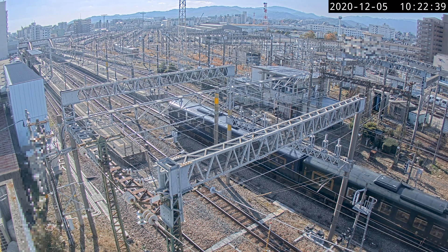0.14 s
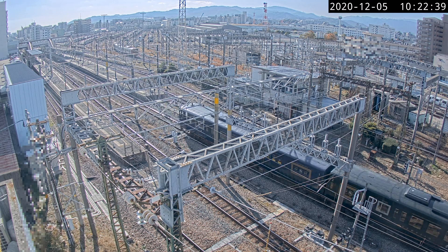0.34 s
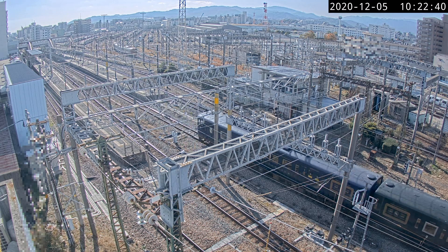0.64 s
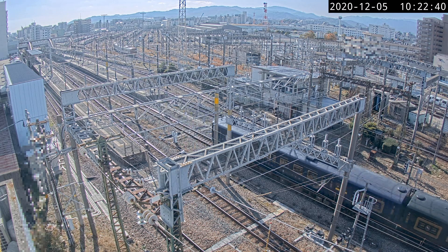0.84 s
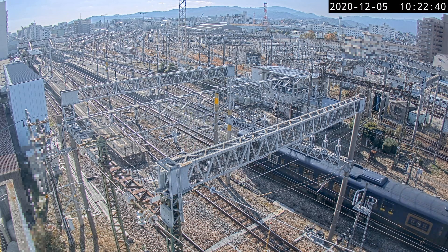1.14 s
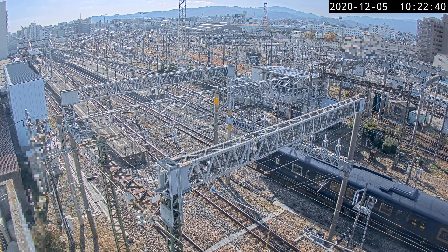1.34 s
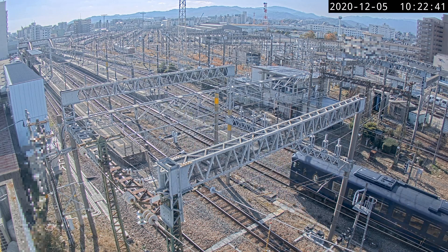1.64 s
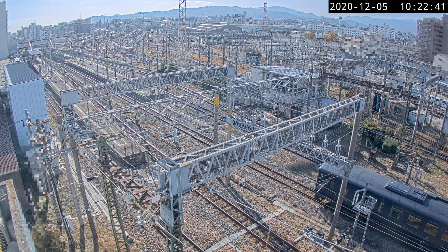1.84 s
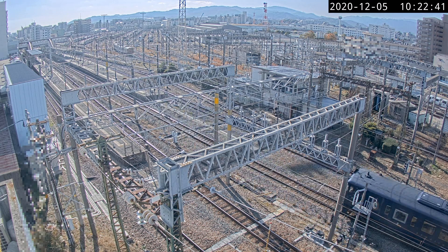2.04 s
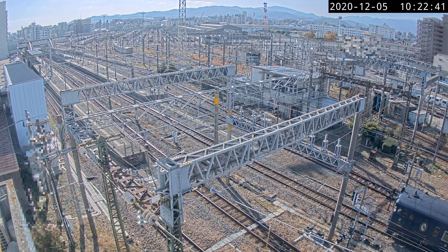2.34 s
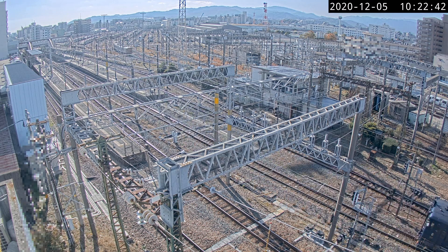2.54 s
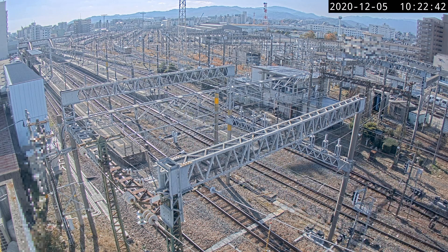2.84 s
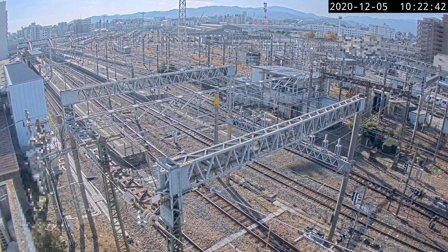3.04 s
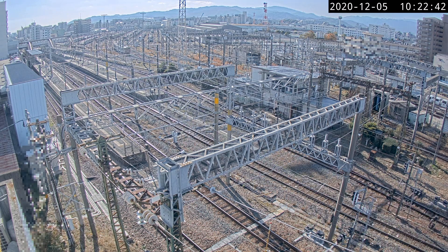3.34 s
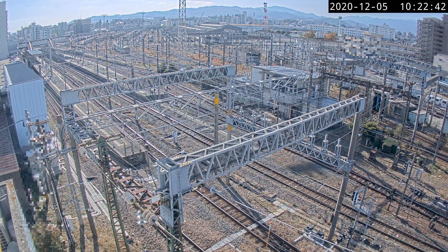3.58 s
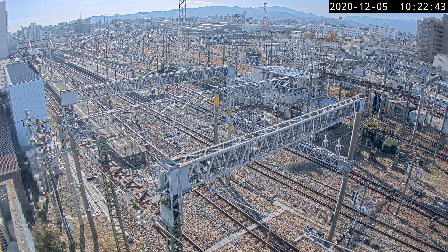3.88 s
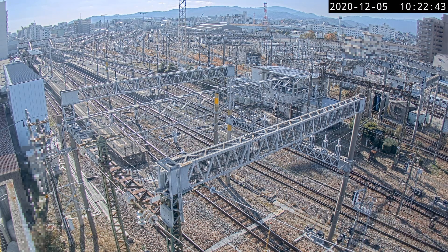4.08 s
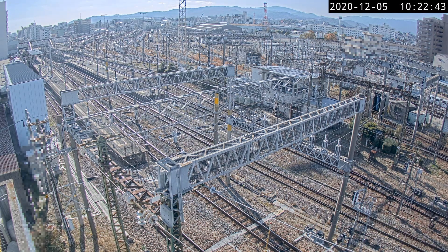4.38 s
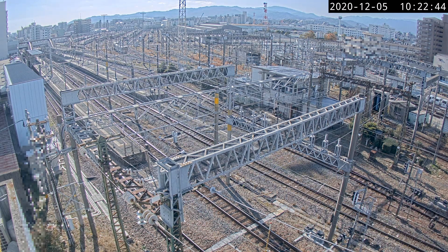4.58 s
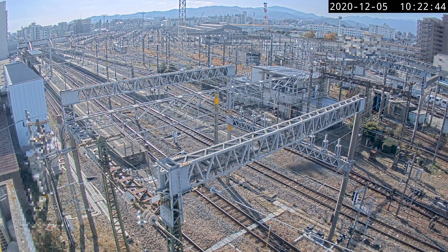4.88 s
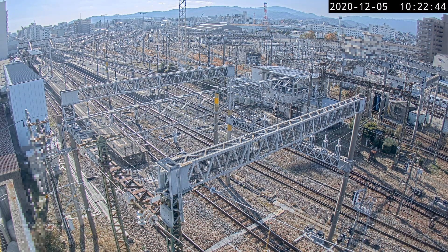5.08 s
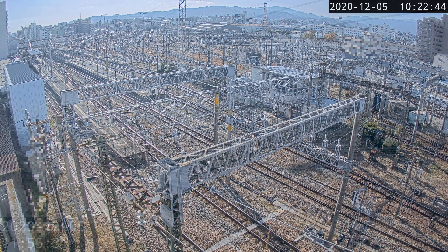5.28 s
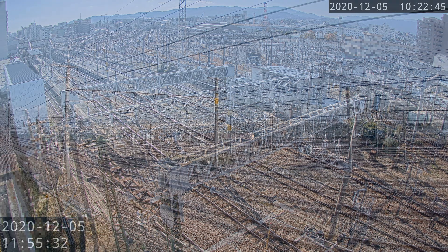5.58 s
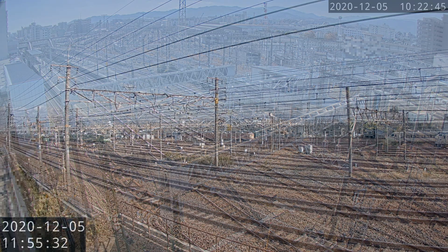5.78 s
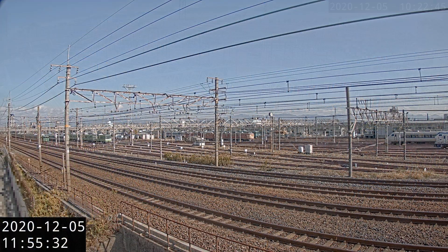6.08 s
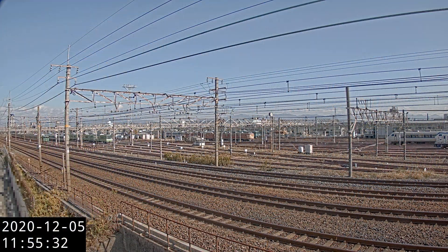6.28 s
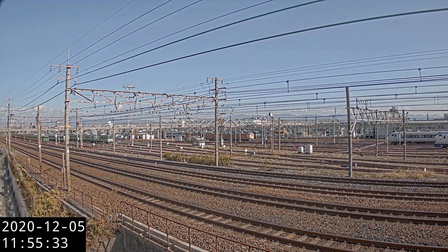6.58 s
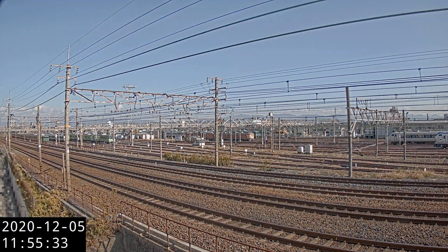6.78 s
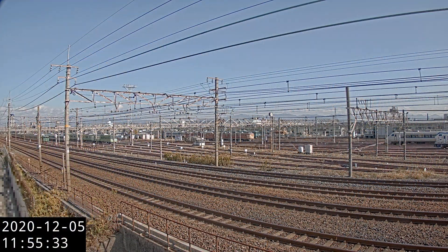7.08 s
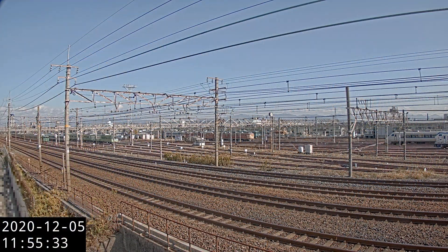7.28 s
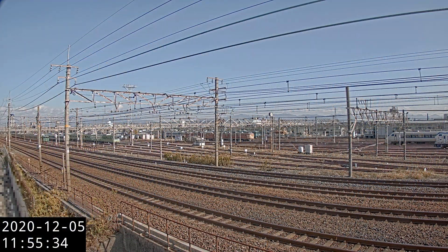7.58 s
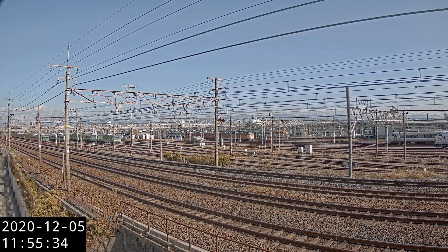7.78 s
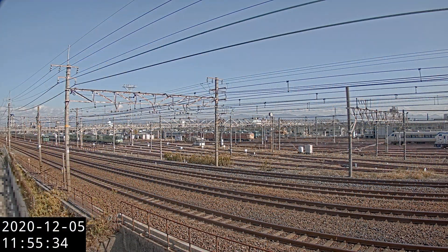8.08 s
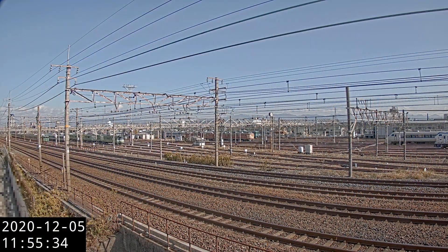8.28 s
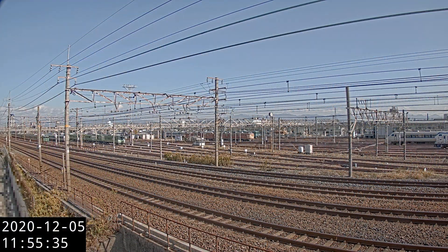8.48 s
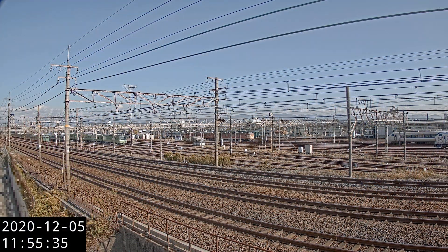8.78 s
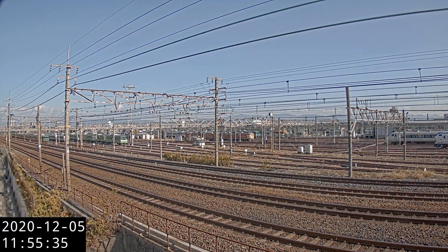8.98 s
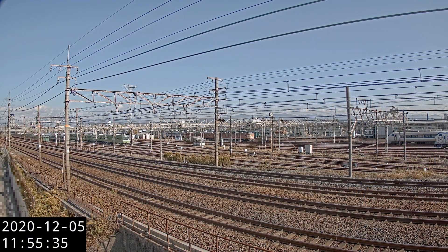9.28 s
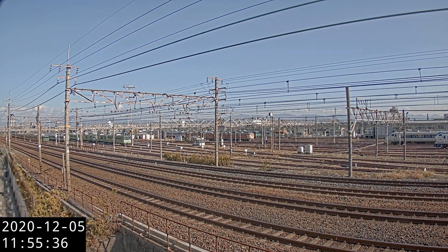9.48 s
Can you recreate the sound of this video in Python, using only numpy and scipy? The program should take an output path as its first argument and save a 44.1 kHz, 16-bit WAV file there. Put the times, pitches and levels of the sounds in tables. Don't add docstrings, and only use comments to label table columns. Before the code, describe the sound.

The last cars of a train pass an elevated microphone in a rail yard: broad, boxy wheel roar, bass thumps and very high, scraping flange whine. Two dull joint knocks land as the tail leaves, the whine slides down and the roar loses treble. A crossfade brings much quieter empty tracks with distant hum, small dry ticks and faint rustles.

```python
import sys
import numpy as np
from scipy import signal
from scipy.io import wavfile
from scipy.ndimage import uniform_filter1d

SR = 44100
rng = np.random.default_rng(int(sys.argv[2]) if len(sys.argv) > 2 else 0)


def makeup_ratio(level_db):
    decades = np.asarray(level_db, float) / 20
    return 10 ** decades


def to_wav(sig):
    pcm = np.clip(np.atleast_2d(sig), -1, 1) * 32767
    pcm = np.round(pcm).astype(np.int16)
    wavfile.write(sys.argv[1], SR, pcm.T)


N = 424669
SIZE, HOP = 2048, 512


def spectrum(table, hz):
    f, db = np.transpose(table)
    return np.interp(np.log(np.maximum(hz, 1)), np.log(f), db)


def stft(x):
    return signal.stft(x, SR, nperseg=SIZE, noverlap=SIZE - HOP)


def istft(z):
    return signal.istft(z, SR, nperseg=SIZE, noverlap=SIZE - HOP)[1][:N]


def patches(shape, bins, rate):
    field = uniform_filter1d(rng.standard_normal(shape), max(int(bins), 1), axis=0)
    field = uniform_filter1d(field, max(int(SR / HOP / rate), 1), axis=1)
    return field / field.std()


def roar(colour, swell_db, flicker_db):
    hz, s, z = stft(rng.standard_normal(N))
    swell = swell_db * patches(z.shape, 87, 3)
    flicker = flicker_db * patches(z.shape, 24, 14)
    return istft(z * makeup_ratio(colour(hz, s) + swell + flicker)) * np.sqrt(SR / 2 / 350)


def waver(width_hz):
    low_pass = signal.butter(2, width_hz / 2, fs=SR, output="sos")
    w = signal.sosfilt(low_pass, rng.standard_normal((2, N)))
    return (w[0] + 1j * w[1]) / w.std() / np.sqrt(2)


def line(hz, level_db, parts):
    carrier = np.exp(2j * np.pi * np.cumsum(hz * np.ones(N)) / SR)
    modulation = sum(makeup_ratio(db) * waver(width) for width, db in parts)
    return np.sqrt(2) * makeup_ratio(level_db) * (carrier * modulation).real


def played(table):
    t, db = np.transpose(table)
    times = np.r_[t[0] - .15, t, t[-1] + .15]
    return np.interp(np.arange(N) / SR, times, np.r_[-200, db, -200])


def swells(table, rise, fall, s):
    t, db = np.array(table, float).T[:, :, None]
    return np.max(db - np.where(s < t, rise * (t - s), fall * (s - t)), axis=0)


def burst_shape(s, decay):
    return (1 - np.exp(-s / 0.0015)) * np.exp(-s / decay)


def fade_out(s):
    return np.interp(s, (5.406, 6.186), [1, 0]) ** 1.93


def hiss():
    return makeup_ratio(-85.5) * rng.standard_normal(N)


def flecks():
    rate, level_db, spread_db = 30, -84, 4
    strength = makeup_ratio(level_db + spread_db * np.minimum(rng.exponential(size=N), 3))
    start = (rng.random(N) < rate / SR) * strength
    decay = np.exp(-1 / (.004 * SR))
    burst = signal.lfilter([1], [1, -decay], start) * rng.standard_normal(N)
    return signal.sosfilt(signal.butter(2, [4800, 9000], "bandpass", fs=SR, output="sos"), burst)


def yard():
    # frequency in Hz, level in dB per Hz.
    hum_colour = [(20, 0), (60, 3), (120, -4.5), (250, -5.5), (500, -2.5), (740, -0.5), (845, 5.5),
                  (910, -7.5), (1020, -20.5), (1300, -14), (1500, -19), (2200, -5), (2500, -18), (2750, -37),
                  (3100, -21.5), (3600, -15), (4200, -22), (4700, -33), (4850, -32.5), (5350, -23.5),
                (6200, -35), (6700, -33.5), (7900, -36), (8600, -42), (10600, -38.5), (13000, -47),
                (15700, -58)]
    # frequency in Hz, line width in Hz, level in dB.
    machine_lines = [
        (63.4, 3, -64.5),
        (124, 10.5, -76),
        (2870, 8, -90.5),
    ]
    fade_in_s = (5.5, 6.07)

    def colour(hz, s):
        top = np.clip(np.log2(np.maximum(hz, 1) / 1200), 0, 1)
        since = s - fade_in_s[-1]
        level_db = -58 + 0.31 * since
        treble_db = -0.5 + 0.57 * since
        return spectrum(hum_colour, hz)[:, None] + level_db + np.outer(top, treble_db)
    machines = sum(line(hz, db, [(width, 0)]) for hz, width, db in machine_lines)
    hum = roar(colour, swell_db=.3, flicker_db=.8)
    return (hum + machines + flecks()) * np.interp(np.arange(N) / SR, fade_in_s, [0, 1])


def ticks():
    # start in seconds, peak in dB, ring in Hz, top in Hz, decay in seconds.
    crackles = [(5.322, -49, 5820, 9000, .013), (5.457, -47, 5540, 9500, 0.011),
                (5.489, -56, 8550, 11000, .02), (5.49, -73, 13800, 14500, .03),
                (5.35, -63, 8000, 11000, 0.025), (5.54, -56, 5800, 11000, .01),
                (5.74, -60, 7140, 8000, .0085), (6.474, -65, 5370, 5980, .0045),
                (6.637, -66, 5280, 8050, .005), (7.23, -66.5, 5500, 9050, .006),
                (7.6, -68, 5500, 8000, .006), (6.77, -79, 13900, 14000, .01), (7.77, -65, 5430, 7500, .006),
                (7.937, -65, 6650, 9000, .005), (8.228, -69, 6970, 8000, .006),
                (8.56, -60.5, 3550, 4200, .015), (8.505, -59, 3600, 4000, 0.05),
                (8.521, -57, 3100, 4000, 0.033), (8.611, -56, 5540, 12000, .0046),
                (8.653, -63, 7000, 12000, .006), (8.656, -47, 2300, 7000, 0.0044),
                (8.729, -71, 9750, 10500, .005), (9.479, -71, 6500, 8750, .005)]
    # start in seconds, peak in dB.
    stalks = [
        (5.6, -80),
        (6.7, -82),
        (7.15, -81),
        (7.66, -81.5),
        (8.35, -83),
        (8.39, -83),
        (9.13, -81),
    ]
    stalk_shape = (10500, 12000, .03)
    events = crackles + [stalk + stalk_shape for stalk in stalks]
    out, s = np.zeros(N), np.arange(4000) / SR
    for (t, db, hz, top_hz, decay), noise in zip(events, rng.standard_normal((len(events), 4000))):
        broad = signal.butter(3, [0.22 * top_hz, top_hz], "bandpass", fs=SR, output="sos")
        narrow = signal.butter(2, [.965 * hz, 1.035 * hz], "bandpass", fs=SR, output="sos")
        crack = signal.sosfilt(broad, noise)
        ring = signal.sosfilt(narrow, noise)
        i = int(t * SR)
        out[i:i + 4000] += makeup_ratio(db) * (1.2 * crack + 6.5 * ring) * burst_shape(s, decay)
    return out


def underframe():
    # time in seconds, peak in dB.
    thumps = [(.05, -42), (.17, -44), (.32, -53), (1.77, -50), (1.95, -50), (2.12, -34), (2.51, -54),
              (2.98, -44), (3.29, -52), (3.72, -54), (3.96, -51), (4.74, -40), (5.0, -44), (5.1, -42),
              (5.85, -52)]
    # time in seconds, peak in dB.
    motors = [(0, -46), (.35, -45), (.85, -42), (1.27, -41.5), (1.68, -44), (2.0, -49), (2.23, -37),
              (2.41, -38), (2.83, -42), (3.52, -35), (3.92, -48)]
    s = np.arange(N) / SR
    bass = makeup_ratio(-54) * fade_out(s) + makeup_ratio(swells(thumps, 230, 310, s))
    hum_db = swells(motors, 63, 110, s)
    return bass * line(55, 0, [(65, -1.5)]) + line(143.2, hum_db, [(20, -5)])


def joints():
    # start in seconds, peak in dB, decay in seconds.
    knocks = [
        (3.293, -25, .012),
        (3.438, -23, .016),
        (5.303, -41, .012),
    ]
    cavities = (((250, 950), 5.), ((1000, 2600), 2.5), ((2900, 4300), .8))
    out, s = np.zeros(N), np.arange(4000) / SR
    for (t, db, decay), noise in zip(knocks, rng.standard_normal((len(knocks), 4000))):
        knock = np.zeros(4000)
        for band, gain in cavities:
            resonance = signal.butter(2, band, "bandpass", fs=SR, output="sos")
            knock += gain * signal.sosfilt(resonance, noise)
        i = int(t * SR)
        out[i:i + 4000] += makeup_ratio(db) * knock * burst_shape(s, decay)
    return out


def grip(s):
    # time in seconds, level over resting in dB.
    bites = [(0, 6), (.2, 3), (.45, 4.5), (.65, 7), (.78, 1), (1.11, 13), (1.22, 8), (1.35, 6.5), (1.72, 8),
             (1.85, 13.5), (1.98, 4.5), (2.2, 6.5), (2.36, 7.5), (2.46, 12), (2.6, 5.5), (2.82, 0.5),
             (2.98, 4), (3.24, 2.5), (3.34, 12.5), (3.5, 13), (3.74, 14), (3.88, 7), (4.07, 5.5), (4.12, 7)]
    return np.maximum(swells(bites, 54, 42, s), 0.5)


def whines():
    # start in seconds, end in seconds, first pitch in Hz, sag in Hz per s.
    alongside = [
        (0, .88, 9730, 60),
        (.08, .3, 9985, 60),
        (.84, 1.4, 9940, 80),
        (1.4, 2.8, 9870, 160),
        (1.15, 2.9, 9450, 0),
    ]
    # time in seconds, pitch in Hz.
    leaving = [
        [(2.94, 9620), (3.1, 9610), (3.22, 9500), (3.45, 9050), (3.55, 8800), (3.75, 8350), (3.92, 7560)],
        [(4.04, 7440), (4.21, 6850)],
    ]
    # level in dB at its start, level in dB at its end.
    rest_db = [
        (-44.5, -46.5),
        (-39, -48),
        (-49.5, -40.5),
        (-44, -43),
        (-60, -44.5),
        (-46, -63.5),
        (-61, -70),
    ]
    pure_db = [-2, -8, -3, -6, -11, -7, -3]
    around = [(70, -6), (340, -6)]
    above_hz, scrape = 330, (700, -10)
    s, sung = np.arange(N) / SR, []
    pitches = [[(t0, hz), (t1, hz - sag * (t1 - t0))] for t0, t1, hz, sag in alongside] + leaving
    bite_db = grip(s)
    for pitch, (from_db, to_db), clean_db in zip(pitches, rest_db, pure_db):
        hz = np.interp(s, *np.transpose(pitch))
        db = played([(pitch[0][0], from_db), (pitch[-1][0], to_db)]) + bite_db
        tone = line(hz, db, [(16, clean_db)] + around)
        sung.append(tone + line(hz + above_hz, db, [scrape]))
    edge = signal.ellip(6, .5, 30, .965 * pitches[0][-1][1], "highpass", fs=SR, output="sos")
    return signal.sosfilt(edge, sum(sung[:-2])) + sum(sung[-2:])


def rolling():
    # time in seconds, rolling level in dB, distance from 0 near to 1 gone.
    passing = [(0, -32, -0.08), (.7, -31, .07), (1.0, -31.5, -0.14), (1.25, -31, -.04),
               (1.55, -33, -0.0028), (2.1, -32.5, -0.056), (2.45, -32, -0.036), (2.8, -31, 0.17),
               (3.15, -33.5, 0.14), (3.45, -33.5, 0.26), (3.75, -33, 0.63), (4.2, -35.5, 0.74),
               (4.65, -38, 0.82), (5.2, -36.5, 0.98), (5.6, -37.5, 0.93)]
    # frequency in Hz, level in dB
    # per Hz.
    near_colour = [(30, -29), (110, -11), (220, -9.5), (400, -6), (560, -1.5), (700, -1.5), (815, 3),
                   (950, -7.5), (1100, -12.5), (1600, -10), (1950, -4.5), (2220, -0.5), (2480, -5),
                   (2800, -19.5),
                   (3200, -13), (4100, -10.5), (4400, -13.5), (4850, -24.5), (5600, -14), (6100, -17.5),
                 (6600, -25.5), (7200, -20), (8100, -26), (9300, -18.5), (10500, -22.5), (12500, -31),
                 (13000, -31), (15700, -39)]
    # frequency in Hz, level in dB per Hz.
    far_colour = [(70, -21), (110, -11), (250, -6), (500, -1.5), (810, 1), (950, -8), (1100, -18), (1900, -10),
                  (2400, -6.5), (2800, -32.5), (3300, -26.5), (3850, -30), (4100, -19), (4350, -30.5),
                  (4600, -37.5), (4900, -32.5), (5400, -26), (5900, -25.5), (6600, -43), (7100, -36),
                (7500, -41.5), (8700, -30.5), (9900, -44), (10500, -39), (12600, -56), (13700, -50.5),
                (14800, -60.5), (15650, -50.5)]
    t, roll_db, distance = np.transpose(passing)

    def colour(hz, s):
        top = np.clip(np.log2(np.maximum(hz, 1) / 7500) / 0.29, 0, 1)
        rail = np.exp(-(np.log2(np.maximum(hz, 1) / 2100) / .5) ** 2)
        near = spectrum(near_colour, hz)
        absorbed = spectrum(far_colour, hz) - near
        far = np.interp(s, t, distance)
        ring_db = np.interp(far, [.03, .2, .65, 1], [0.1, 3, 3, -1.05])
        alongside_db = np.maximum(swells([(1.77, 4.9)], 6.1, 3.1, s), 0)
        sizzle_db = -1.6 + 0.13 * grip(s) - 3 * far + alongside_db
        return (near[:, None] + np.interp(s, t, roll_db) + np.outer(absorbed, far)
                + np.outer(top, sizzle_db) + np.outer(rail, ring_db))
    return roar(colour, swell_db=.4, flicker_db=.9) * fade_out(np.arange(N) / SR)


def scene():
    mono = hiss() + yard() + ticks() + underframe() + joints() + whines() + rolling()
    return np.array([mono, mono])


def thin_out(x):
    # middle in seconds, length in seconds, lowest Hz, level left between the lines in dB.
    moments = [(1.637, .012, 2500, -20), (1.872, .014, 1000, -22), (2.47, .012, 1000, -16),
               (2.757, .026, 300, -45), (2.812, .011, 3500, -20), (2.973, .027, 2500, -45),
               (3.44, .028, 2500, -45), (3.941, .008, 3000, -20), (4.006, .010, 2700, -16),
               (4.050, .010, 2700, -18), (4.093, .010, 3000, -22), (6.173, .012, 3000, -14),
               (6.428, .012, 3500, -12), (9.542, .012, 3500, -12)]
    hz, _, z = stft(x)
    ridge = uniform_filter1d(uniform_filter1d(abs(z), 30, axis=1), 8, axis=0)
    trend = uniform_filter1d(ridge, 110, axis=0)
    low_line = (hz < 4400)[:, None] & (abs(z) > 1.8 * ridge)
    on_peak = (ridge > 1.2 * trend) | low_line
    top_line = (abs(hz - 15330) < 45)[:, None]
    share = np.where(on_peak & (abs(z) > 1.75 * ridge), -.7, 1)
    weak = istft(z * np.where(top_line, -1.5, share))
    s, out = np.arange(N) / SR, x.copy()
    for t, length, from_hz, left_db in moments:
        part = slice(int((t - .1) * SR), int((t + .08) * SR))
        gate = np.clip((length / 2 + .006 - abs(s[part] - t)) / .012, 0, 1)
        high_pass = signal.butter(6, from_hz, "highpass", fs=SR, output="sos")
        lost = signal.sosfiltfilt(high_pass, weak[part])
        out[part] -= (1 - makeup_ratio(left_db)) * np.sin(np.pi / 2 * gate) * lost
    return out


def skip_top(x):
    from_s, to_s, low_hz, high_hz = 4.3, 5.7, 14300, 15450
    hz, s, z = stft(x)
    chance = rng.random((len(hz) // 32 + 1, len(s) // 3 + 1))
    chance = np.repeat(chance, 32, axis=0).repeat(3, axis=1)[:len(hz), :len(s)]
    region = np.outer((hz > low_hz) & (hz < high_hz), (s > from_s) & (s < to_s))
    return x - istft(z * ((chance < .3) & region))


def band_limit(x):
    return signal.sosfilt(signal.butter(12, 15720, fs=SR, output="sos"), x)


def record(dry):
    rounded = np.tanh(2.5 * dry[0]) / 2.5
    x = skip_top(thin_out(rounded))
    return band_limit(np.array([x, x]))


dry = scene()
out = record(dry)
to_wav(out)
```